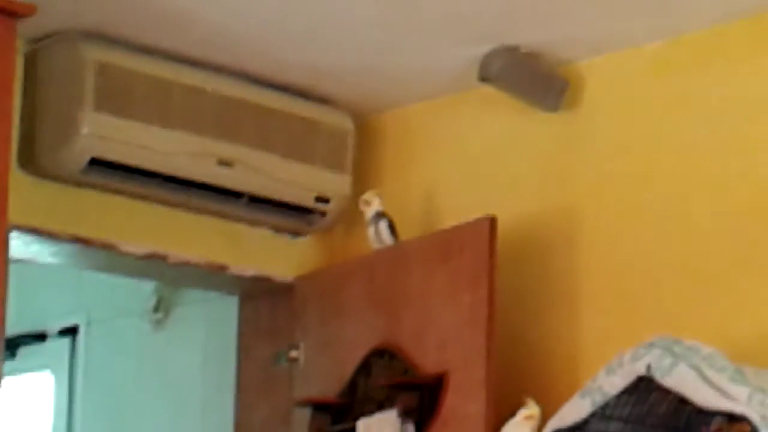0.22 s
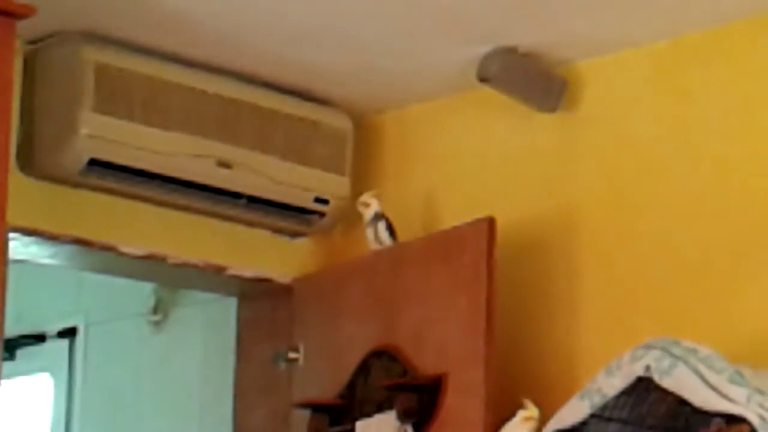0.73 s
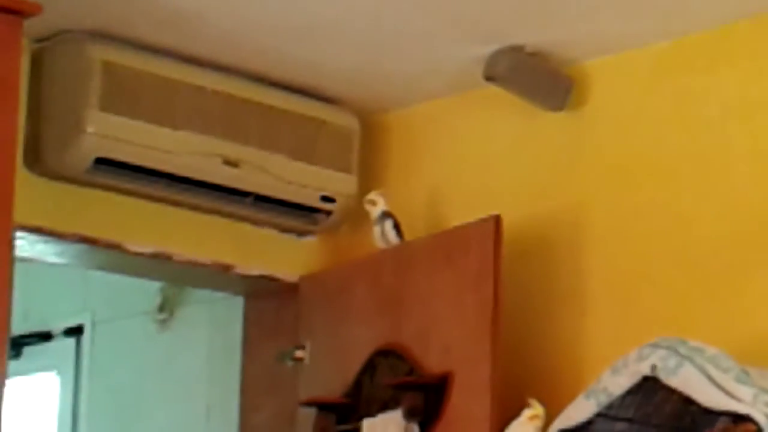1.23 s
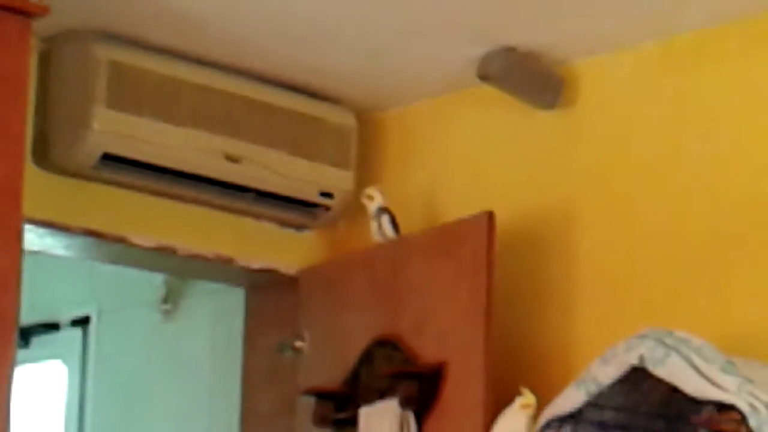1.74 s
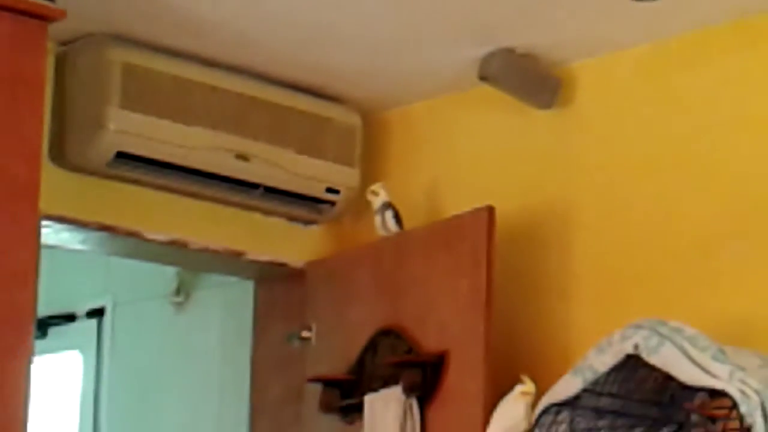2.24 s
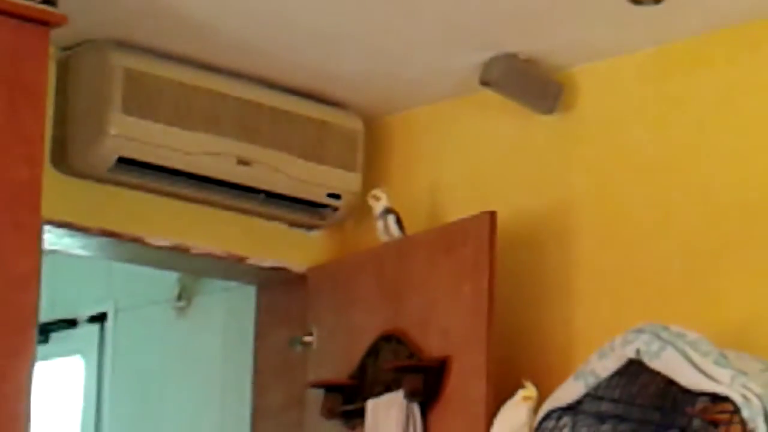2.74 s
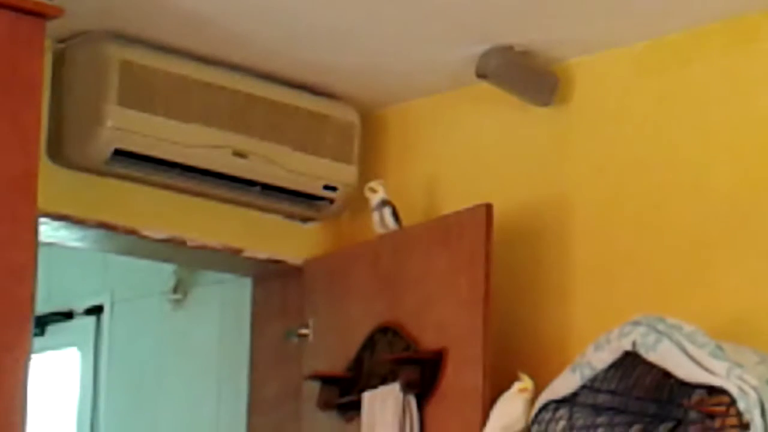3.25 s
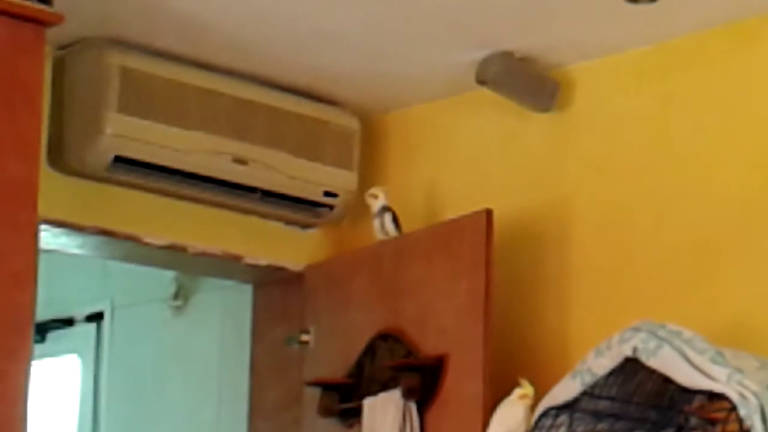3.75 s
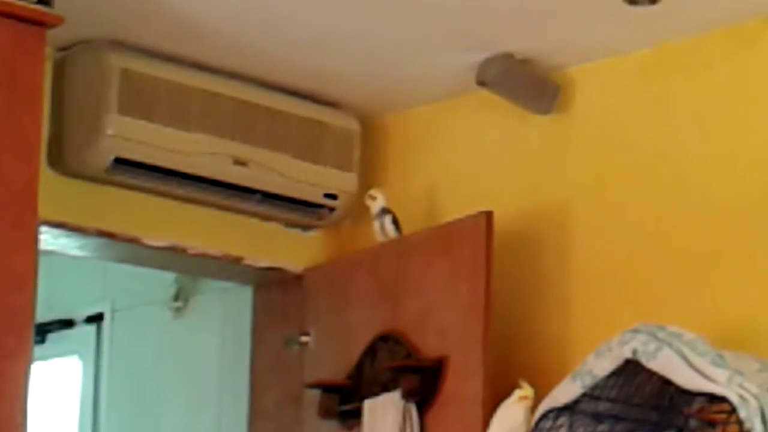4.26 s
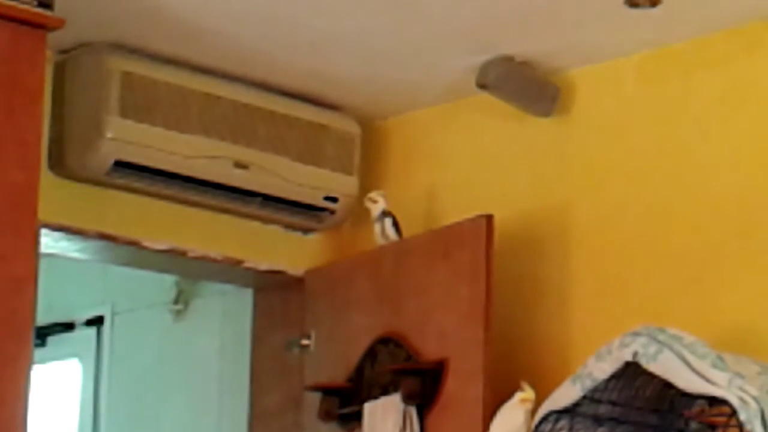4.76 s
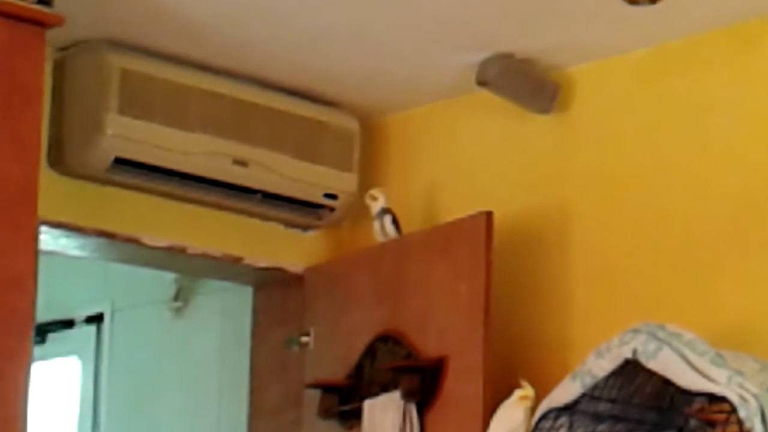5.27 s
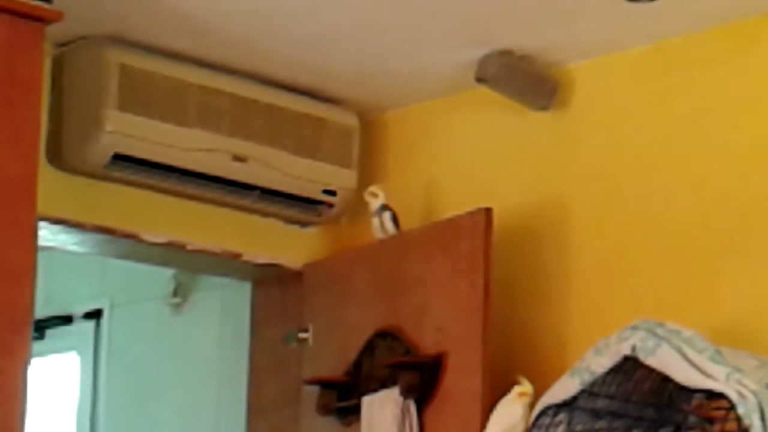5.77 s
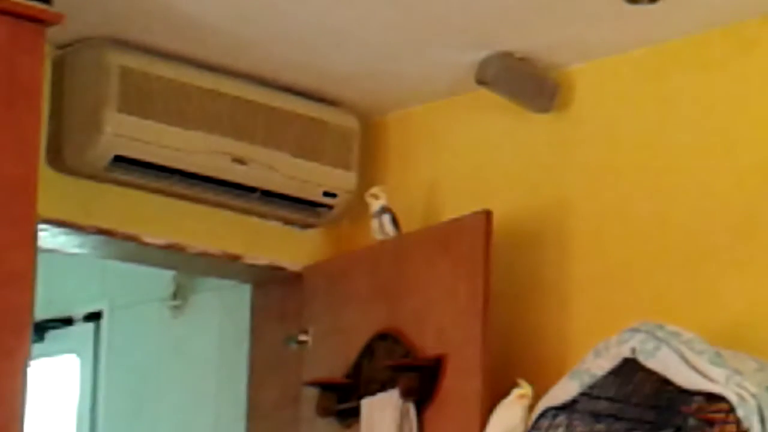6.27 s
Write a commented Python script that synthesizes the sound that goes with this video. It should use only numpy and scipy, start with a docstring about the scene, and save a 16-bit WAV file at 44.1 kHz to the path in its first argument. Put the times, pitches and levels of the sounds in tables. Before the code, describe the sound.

Indoors, a mono microphone some way from two pet cockatiels picks up short rising and falling whistles with a bright, ringing room tail. The first half is busy, with a few sharp ticks close to the microphone; the middle is quieter, just soft croaky notes and faint hollow knocks. Softer chirps return toward the end, the last cut close to the finish. Low rumble and thin hiss dip in the pauses.

```python
"""Cockatiels in a hard-walled room

Two cockatiels whistle chirps at one microphone, with low raspy chatter in between.
Each call is a gliding tone with overtones from one membrane model, smeared by a decaying-noise room.
Close dry ticks and dull handling bumps are short noise bursts; faint soft hollow knocks ring near 600 Hz.
Rumble and hiss are shaped noise and the hum is a wavering sine; thin whistles are steady tones.
A noise suppressor lowers everything between calls, and the recorder keeps nothing above its band limit.
"""
import sys
import numpy as np
from scipy import signal
from scipy.fft import rfft, irfft, next_fast_len
from scipy.io import wavfile
from scipy.ndimage import map_coordinates

SR = 44100
rng = np.random.default_rng(int(sys.argv[2]) if len(sys.argv) > 2 else 0)


def to_wav(sig):
    """Store sig (one row per channel, or 1-D mono) as 16-bit WAV at the path in sys.argv[1].

    Samples outside -1..1 are clipped; the rate is SR.
    """
    pcm = np.clip(np.atleast_2d(sig), -1, 1) * 32767
    pcm = np.round(pcm).astype(np.int16)
    wavfile.write(sys.argv[1], SR, pcm.T)  # frames by channels


N = 287532


def amp(db):
    """Decibels to gain."""
    return 10 ** (np.asarray(db) / 20)


def unit(x):
    """Scale a signal to rms 1."""
    return x / np.sqrt(np.mean(x ** 2) + 1e-20)


def along(points, hz):
    """Read (frequency, value) points on a log-frequency axis."""
    f, v = np.transpose(points)
    return np.interp(np.log(hz + 1), np.log(f + 1), v)


def curves(rows, t):
    """Read each column after the time column at the times t."""
    s, *cols = np.transpose(rows)
    return [np.interp(t, s, c) for c in cols]


def wobble(rate, size):
    """A smooth random curve with rate knots a second."""
    knots = rng.standard_normal(4096)
    return map_coordinates(knots, [np.arange(size) * rate / SR], mode="wrap")


def filtered(x, response):
    """Multiply the spectrum of x by a response given as a function of frequency."""
    m = next_fast_len(len(x) + 4096)
    return irfft(rfft(x, m) * response(np.fft.rfftfreq(m, 1 / SR)), m)[:len(x)]


def noise(spectrum, size):
    """Noise coloured by a (frequency, dB) table, at rms 1."""
    white = rng.standard_normal(size)
    return unit(filtered(white, lambda hz: amp(along(spectrum, hz))))


def add(track, s, x):
    """Mix x into the track from time s on, cutting what runs past the end."""
    start = max(round(s * SR), 0)
    part = x[:max(len(track) - start, 0)]
    track[start:start + len(part)] += part


def lagged(x, seconds):
    """Follow x with a lag, starting from rest."""
    keep = np.exp(-1 / (seconds * SR))
    return signal.lfilter([1 - keep], [1, -keep], x)


# Decay of the hard-walled room: pitch_hz, t60_s
ROOM_DECAY = [(500, 0.4), (1500, 0.52), (2600, 0.32), (5500, 0.39), (12000, 0.46)]


def in_room(x, direct_db, room_db, early_db=4, early_s=.025):
    """Direct sound, strong returns from the near corner and ceiling, then a diffuse tail."""
    white = rng.standard_normal(SR * 3 // 5)
    hz, t, z = signal.stft(white, SR, nperseg=256)
    decay_db = -60 * t / along(ROOM_DECAY, hz)[:, None]
    early_boost_db = early_db * np.exp(-t / early_s)
    response = signal.istft(z * amp(decay_db + early_boost_db), SR, nperseg=256)[1]
    response[:SR // 700] = 0  # gap before the first return
    # the room level is set by its energy in the band of the voices
    voice_band = filtered(response, lambda f: (f > 1500) & (f < 3500))
    response *= amp(room_db) * np.sqrt(4000 / SR) / np.linalg.norm(voice_band)
    response[0] = amp(direct_db)
    return signal.fftconvolve(x, response)


# How the open beak radiates overtones: pitch_hz, level_db
BEAK_RADIATION = [(1200, 15), (3000, -8), (5400, 4), (6400, 1), (8200, 0), (9300, -11), (15000, -33.5)]
# Relative colour of the rasp noise: pitch_hz, level_db (per Hz)
RASP_COLOUR = [(800, -29.5), (1300, -23), (2000, 12), (3000, -7.5), (4300, -2), (5500, -8.5), (7000, -24),
               (10000, -39.5)]


def syrinx(pitch, db, second_db, upper_db=0, rasp=0, hoarse=0, jitter=0.009,
           attack=0.0036, release=0.0027, fall_db=14.0):
    """One vibrating membrane: pure when tense and high, raspy and rich when slack and low."""
    t = np.arange(len(pitch)) / SR
    slack = np.clip((2500 - pitch) / 800, 0, 1)
    collapse = np.clip(-np.gradient(pitch) * SR / 40000, 0, 1)
    # the tone breaks up when the membrane is slack or its tension drops suddenly
    rough = rasp + hoarse * slack + 0.19 * collapse
    warble = .075 * wobble(170, len(t)) + .06 * wobble(560, len(t))
    flutter = jitter * wobble(190, len(t)) + rough * warble
    phase = 2 * np.pi * np.cumsum(pitch * (1 + flutter)) / SR
    tone = np.sin(phase)
    for k in range(2, 6):
        # overtones weaken with number, a little less on a slack membrane
        overtone_db = second_db + (k > 2) * upper_db - (k - 2) * (fall_db - 1.2 * slack)
        tone += amp(overtone_db + along(BEAK_RADIATION, k * pitch)) * np.sin(k * phase)
    # irregular flapping fills the gaps between the overtones
    tone += rough * amp(-7) * noise(RASP_COLOUR, SR // 2)[:len(t)]
    gate = np.clip(t / attack, 0, 1) * np.clip((t[-1] - t) / release, 0, 1)
    shimmer_db = (0.25 + 4 * rough) * wobble(256.8, len(t))
    return np.sqrt(2) * tone * gate * amp(db + shimmer_db)


# All source levels below are ahead of the room, where used, and of the suppressor.
# Relative colours of the rumble and of its deepest part: pitch_hz, level_db (per Hz)
RUMBLE_COLOUR = [(24, -40.5), (31, -15), (42, 2), (55, -2.5), (72, -6), (96, 0.5), (125, -1), (173, 1),
                 (205, -5.5), (265, -2.5), (400, -11), (620, -11.5), (1100, -18.5), (2400, -61.5)]
DEEP_RUMBLE_COLOUR = [(15, -18.5), (30, -10), (43, -2), (58, -3.5), (110, -15), (300, -48), (1000, -100)]
# Room rumble over time: time_s, rumble_level_db, deep_level_db
RUMBLE_LEVELS = [(0, -61, -78), (.8, -58, -73), (1.4, -55.5, -72.5), (1.95, -52.5, -53), (2.5, -58, -62),
                 (3.0, -56.5, -59.5), (3.8, -60.5, -78), (4.7, -56.5, -80), (5.35, -54, -72),
                 (6.52, -56, -74)]


def room_rumble():
    """Low shaped noise, its level drifting, over a separate layer of the deepest noise."""
    rumble_db, deep_db = curves(RUMBLE_LEVELS, np.arange(N) / SR)
    rumble = amp(rumble_db + 1.5 * wobble(4.6, N)) * noise(RUMBLE_COLOUR, N)
    return rumble + amp(deep_db) * noise(DEEP_RUMBLE_COLOUR, N)


# Low hum over time: time_s, level_db
HUM_LEVELS = [(0, -84), (.5, -70), (.97, -79), (1.14, -53), (1.95, -53.5), (2.85, -60), (3.2, -80),
              (3.55, -64), (3.85, -90), (5.3, -54), (5.8, -67), (6.52, -60.5)]


def low_hum(hum_hz=70):
    """One low sine that wavers slightly in pitch and level."""
    hum_db, = curves(HUM_LEVELS, np.arange(N) / SR)
    level = amp(hum_db + 1.5 * wobble(8.2, N))
    return level * np.sin(2 * np.pi * np.cumsum(hum_hz + 0.98 * wobble(4.3, N)) / SR)


# Relative colour of the hiss: pitch_hz, level_db (per Hz)
HISS_COLOUR = [(300, 0), (1000, -1), (2000, -1.5), (4000, -3), (8000, -5.5), (15000, -5.5)]


def even_hiss(level_db=-55.5):
    """Steady broadband noise, sloping down toward the treble."""
    return amp(level_db) * noise(HISS_COLOUR, N)


# Faint soft hollow knocks: start_s, level_db
HOLLOW_KNOCKS = [(.56, -53), (.81, -49.5), (2.12, -53), (3.19, -50.5), (4.43, -51.5), (4.82, -55.5),
                 (5.15, -49), (5.85, -52.5), (6.19, -50)]


def hollow_knocks(hz=610, length=0.033):
    """Faint soft hollow knocks: short sines ringing near 600 Hz, with a smooth rise and fall."""
    out, t = np.zeros(N), np.arange(round(length * SR)) / SR
    for s, db in HOLLOW_KNOCKS:
        pitch = hz * (1.04 - .08 * t / length + .035 * wobble(150, len(t)))
        ring = np.sin(2 * np.pi * np.cumsum(pitch) / SR)
        knock = amp(db) * np.hanning(len(t)) * ring
        add(out, s, in_room(knock, direct_db=-0.5, room_db=4.5))
    return out


# Dry ticks and dull handling bumps: start_s, peak_db
TICK_EVENTS = [(0.7193, -16), (1.0575, -25), (1.6313, -17), (2.3436, -18.5)]
BUMP_EVENTS = [(1.905, -35.5), (2.545, -39)]
# Their relative colours: pitch_hz, level_db
TICK_SPECTRUM = [(200, -6.5), (1300, -7), (2170, -9), (2900, -12), (4900, 6), (6000, -9), (8000, -9.5),
                 (15000, -19)]
BUMP_SPECTRUM = [(30, -16), (120, -0.5), (600, -5.5), (1300, -23.5), (4000, -58)]


def taps(events, colour, t60):
    """Short dry contacts close to the microphone: noise bursts that die away within t60 seconds."""
    out, t = np.zeros(N), np.arange(SR // 10) / SR
    for s, db in events:
        onset = 1 - np.exp(-t / 0.0006)
        click = noise(colour, len(t)) * amp(-60 * t / t60) * onset
        click = amp(db) * click / np.abs(click).max()
        add(out, s, in_room(click, direct_db=-7, room_db=-20.5))
    return out


# Thin steady whistles between calls: start_s, length_s, pitch_hz, end_level_db,
# second_harmonic_db (before the beak)
THIN_WHISTLES = [(.12, 0.12, 2540, -60.5, -11), (3.261, 0.17, 1950, -49, -12.5)]


def thin_whistles():
    """Faint tones of steady pitch that swell between the calls."""
    out = np.zeros(N)
    for s, length, hz, db, second_db in THIN_WHISTLES:
        u = np.linspace(0, 1, round(length * SR))
        note = syrinx(np.full(len(u), hz), db - 8 * (1 - u), second_db, jitter=0.0017, attack=0.018)
        add(out, s, in_room(note, direct_db=-5.0, room_db=4))
    return out


# Low raspy notes that never reach the whistle, each gliding along a small curve:
# start_s, length_s, start_hz, middle_hz, end_hz, level_db, swell_db (start to end),
# second_harmonic_db and upper_overtones_db (before the beak), rasp (0-1)
CHATTER_NOTES = [(0.744, 0.096, 1329, 1472, 1850, -39.5, 13, -3, 1.5, 0.49),
                 (1.282, .165, 1328, 1840, 1426, -36, 1, 0.5, -3, 0.4),
                 (3.929, 0.058, 1394, 1407, 1530, -44, -7, -7, -34.5, 0.56),
                 (3.944, 0.1, 1955, 1860, 1840, -55.5, 1, -31.5, -38, .74),
                 (4.138, 0.024, 1710, 1704, 1672, -37.5, -5, 10.5, 3, .25),
                 (4.162, 0.051, 1765, 1834, 1795, -39, -2, -6, -7, 1),
                 (4.325, 0.073, 1413, 1339, 1277, -39, -9, -1, -23, 0.3),
                 (4.621, .09, 1540, 1385, 1340, -45, -5.5, -2, -26, 0.59),
                 (4.79, 0.0686, 1388, 1461, 1584, -40.5, -2.5, -11.5, -25, 0.51),
                 (5.605, 0.11, 1321, 1455, 1300, -39, 4.5, -1, -5, .6)]


def chatter(flutter_db=3.5, flutter_rate=110):
    """Soft rasping on a slack membrane that flaps in uneven bursts."""
    out = np.zeros(N)
    for (s, length, start_hz, middle_hz, end_hz, db, swell_db,
         second_db, upper_db, rasp) in CHATTER_NOTES:
        u = np.linspace(0, 1, round(length * SR))
        pitch = np.polyval(np.polyfit([0, .5, 1], [start_hz, middle_hz, end_hz], 2), u)
        flapping_db = flutter_db * (wobble(flutter_rate, len(u)) - .5)
        level_db = db + swell_db * (u - .5) + flapping_db
        note = syrinx(pitch, level_db, second_db, upper_db, rasp)
        add(out, s, in_room(note, direct_db=-2.5, room_db=-1.5))
    return out


# the jump from the hoarse voice to the whistle
BREAK_FROM_HZ, WHISTLE_HZ, BREAK_S = 1730, 2029.6, .005
CLIMB_BEND, DROP_BEND = 1.7, 2.4  # the climb flattens out, the drop speeds up
# a climbing whistle skips into a louder top register: where, by how much, how suddenly, how far it reaches
SKIP_AT_HZ, SKIP_HZ, SKIP_DB, SKIP_EDGE_HZ, SKIP_REACH_HZ = 2442, 105.6, 0.5, 20, 183
OPENING_SWELL_DB, DROP_FADE_DB, DROP_DULL_DB, HOARSE = 2.5, 13.5, 7.5, 0.37
CLEARING_S = .035  # the colour of the opening lingers into the whistle
# Second harmonic against the first, before the beak and each chirp's own offsets: pitch_hz, level_db
SECOND_HARMONIC = [(1300, 6), (1700, 3.5), (2030, -4.5), (2300, -15.5), (2500, -9.5), (2650, -22.5),
                   (2850, -18)]
# A chirp opens low and hoarse, breaks into a whistle, moves to a crest and ends in a short drop:
# start_s, opening_s, climb_s, drop_s, start_hz, crest_hz, end_hz (pitches before the skip),
# opening_db, break_db, crest_db, opening_overtones_db, whistle_overtones_db (added to the second
# harmonic), direct_db, added_rasp (0-1)
CHIRP_CALLS = [(0.227, .035, .17, 0.059, 1516, 2752, 1680, -35.5, -30, -23, 4, 1.5, -11.5, 0.03),
               (0.823, 0.079, 0.062, 0.0395, 1841, 2370, 2220, -31, -23.5, -25.5, -3.5, -3.5, -8.5, 0.09),
               (1.457, 0.023, 0.032, 0.066, 1600, 2240, 2120, -40.5, -28, -34, -4, 1, -11, .06),
               (1.812, 0.021, .048, 0.018, 1627, 2321, 2060, -29.5, -21, -33, -4.5, 4.5, -13.5, .05),
               (2.077, .056, .112, 0.021, 1351, 2751, 1862, -37.5, -25.5, -18.5, 11, -6.5, 1.5, 0.09),
               (2.423, .018, 0.099, 0.069, 1498, 2864, 1544, -33.5, -18, -15.5, 14, -3.5, -0.5, 0),
               (2.786, 0.0013, .062, 0.0486, 2063, 2726, 2557, -35.5, -35, -17, 4.5, 2, 3, 0),
               (3.1, .056, 0.0054, 0.004, 1235, 1992, 1910, -39, -31.5, -39, -9.5, -18, 1, .03),
               (3.418, .008, .098, 0.052, 1830, 2620, 2085, -32.5, -24, -25.5, -5, 1.5, 1.5, 0),
               (5.221, 0.032, .082, 0.049, 1464, 2280, 2312, -40.5, -32, -36, -10.5, -2, -15, 0.12),
               (5.759, 0.024, 0.037, .046, 1400, 2274, 1984, -48.5, -39.5, -33.5, -15.5, -3.5, 2, .06),
               (6.071, 0.043, .064, 0.004, 1525, 2570, 2460, -38, -31.5, -36, 3, 4, -2, 0),
               (6.432, .03, .08, .024, 1414, 2746, 2600, -39.5, -37, -26, -2.5, 5, -6, 0.14)]


def chirps():
    """Each chirp has its own pitch and loudness path; lower pitch sounds hoarser.

    The birds turn their heads from call to call, so the direct sound varies.
    """
    out = np.zeros(N)
    for (s, opening, climb, drop, start_hz, crest_hz, end_hz, opening_db, break_db, crest_db,
         harsh_db, bright_db, direct_db, rasp) in CHIRP_CALLS:
        t = np.arange(round((opening + climb + drop) * SR)) / SR
        stages = [0, max(opening - BREAK_S, opening / 2), opening]
        risen = 1 - (1 - np.clip((t - opening) / climb, 0, 1)) ** CLIMB_BEND
        fallen = np.clip((t - opening - climb) / drop, 0, 1) ** DROP_BEND

        pitch = np.interp(t, stages, [start_hz, max(start_hz, BREAK_FROM_HZ), WHISTLE_HZ])
        pitch += (crest_hz - WHISTLE_HZ) * risen
        past_skip = pitch - SKIP_AT_HZ
        skip = np.tanh(past_skip / SKIP_EDGE_HZ) * np.exp(-(past_skip / SKIP_REACH_HZ) ** 2)
        skip *= crest_hz > SKIP_AT_HZ  # low chirps stay in the middle register
        pitch += SKIP_HZ * skip - (crest_hz - end_hz) * fallen

        db = np.interp(t, stages, [opening_db - OPENING_SWELL_DB, opening_db, break_db])
        db += (crest_db - break_db) * risen + SKIP_DB * skip - DROP_FADE_DB * fallen

        cleared = np.interp(t, [stages[1], opening, opening + CLEARING_S], [0, .5, 1])
        colour_db = harsh_db + (bright_db - harsh_db) * cleared
        second_db = along(SECOND_HARMONIC, pitch) + colour_db - DROP_DULL_DB * fallen
        note = syrinx(pitch, db, second_db, upper_db=-3, rasp=rasp, hoarse=HOARSE, release=0.0013)
        add(out, s, in_room(note, direct_db, room_db=1.5))
    return out


# noise suppressor: fully open above this level, dB of cut per dB below it, and its speeds
OPEN_DB, CUT_SLOPE, SENSE_S, FOLLOW_S = -27.5, 0.32, 0.0027, 0.071


def suppressed(x, closed_db=-14):
    """The suppressor starts closed, opens with each call and sinks back in the pauses."""
    voice = filtered(x, lambda hz: (hz > 1000) & (hz < 6000))
    level_db = 10 * np.log10(lagged(voice ** 2, SENSE_S) + 1e-12)
    wanted_db = np.clip(CUT_SLOPE * (level_db - OPEN_DB), closed_db, 0)
    return x * amp(closed_db + lagged(wanted_db - closed_db, FOLLOW_S))


def scene():
    """Everything in the room at one microphone."""
    background = room_rumble() + low_hum() + even_hiss()
    ticks = taps(TICK_EVENTS, TICK_SPECTRUM, t60=0.0069)
    bumps = taps(BUMP_EVENTS, BUMP_SPECTRUM, t60=0.0386)
    birds = thin_whistles() + chatter() + chirps()
    return (background + hollow_knocks() + ticks + bumps + birds)[None]


def record(dry, top_hz=15140):
    """The recorder turns quiet moments down and keeps nothing above its band limit."""
    return np.array([filtered(suppressed(channel), lambda hz: hz < top_hz) for channel in dry])


dry = scene()
out = record(dry)
to_wav(out)
```